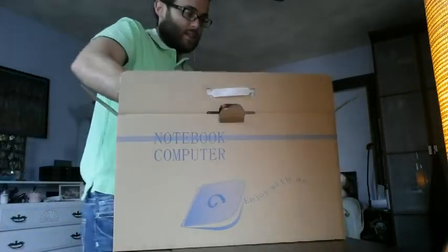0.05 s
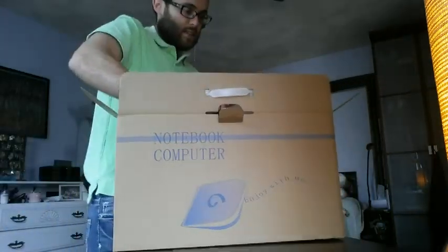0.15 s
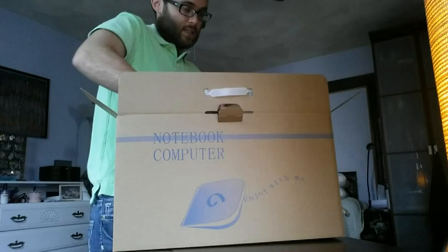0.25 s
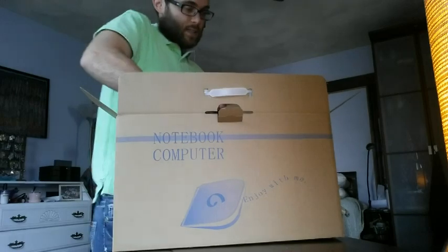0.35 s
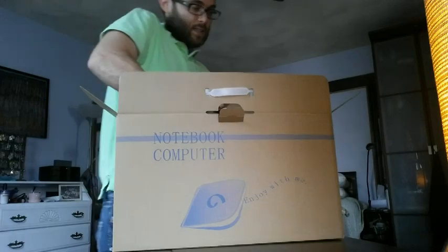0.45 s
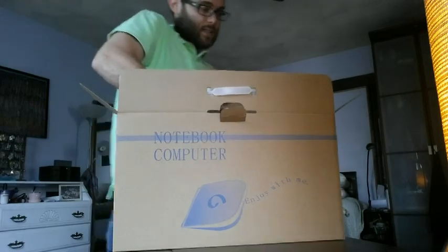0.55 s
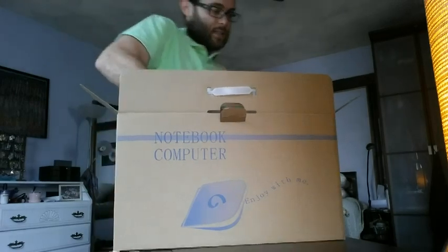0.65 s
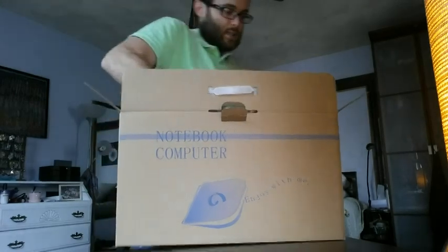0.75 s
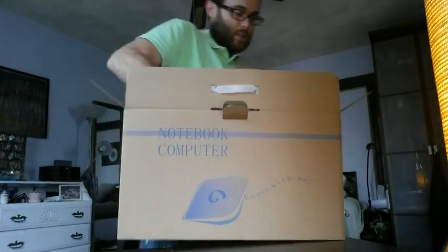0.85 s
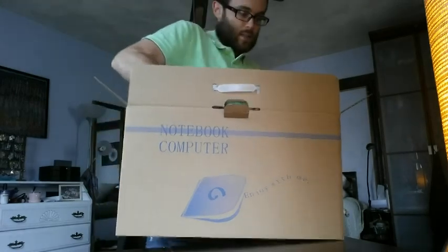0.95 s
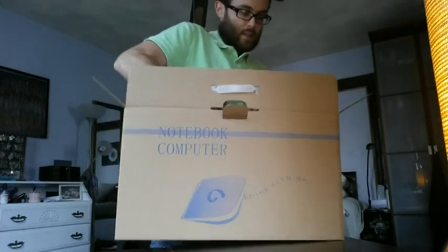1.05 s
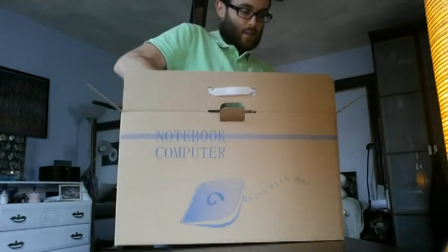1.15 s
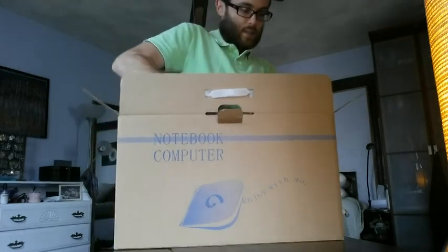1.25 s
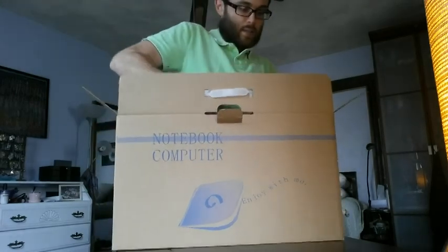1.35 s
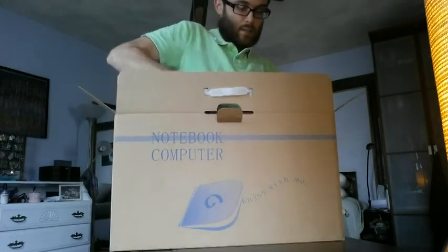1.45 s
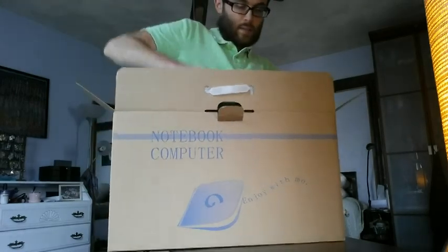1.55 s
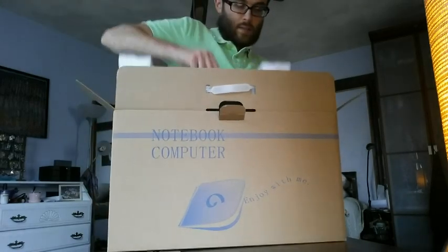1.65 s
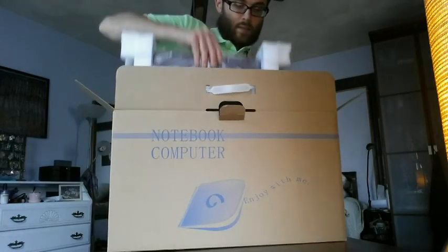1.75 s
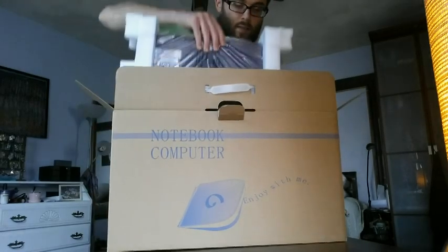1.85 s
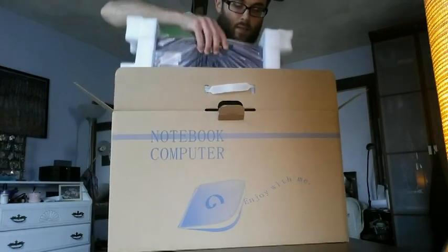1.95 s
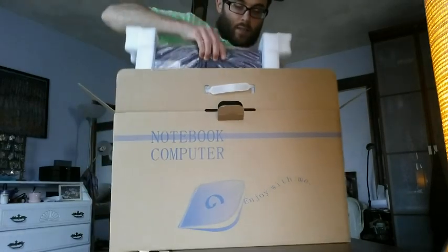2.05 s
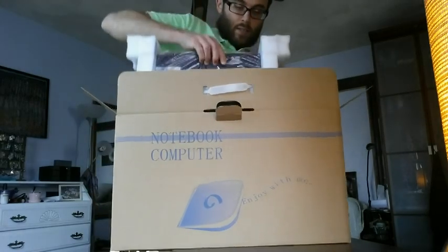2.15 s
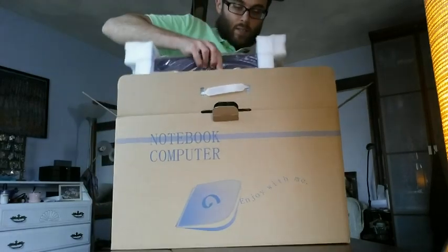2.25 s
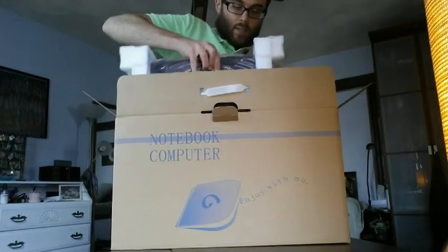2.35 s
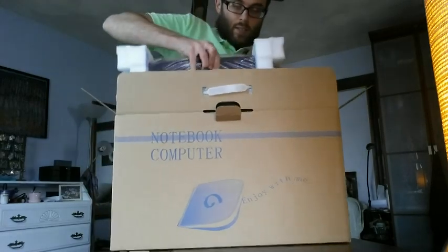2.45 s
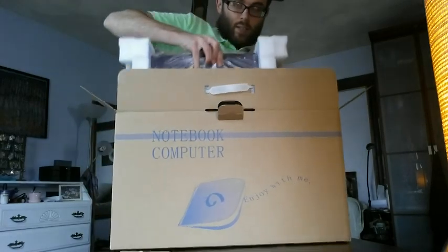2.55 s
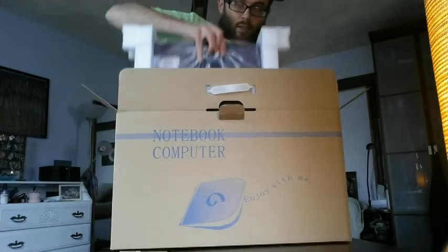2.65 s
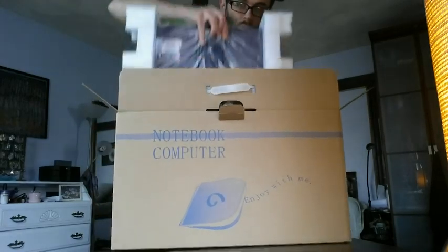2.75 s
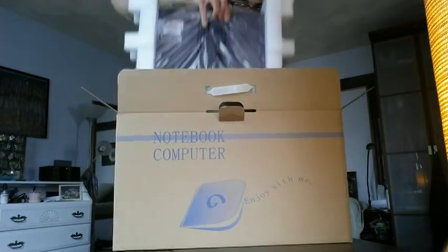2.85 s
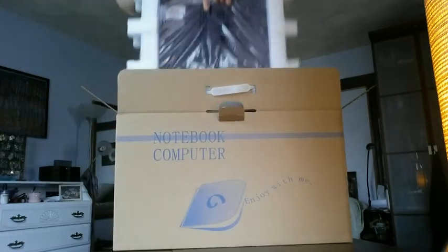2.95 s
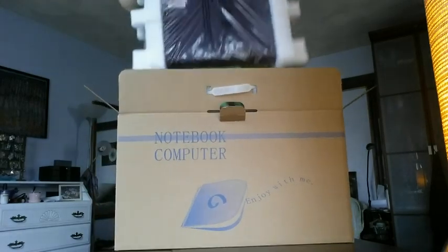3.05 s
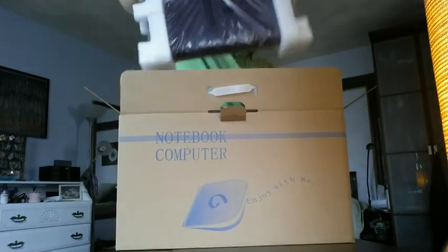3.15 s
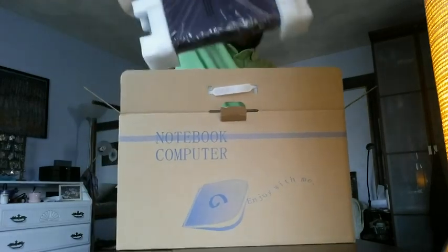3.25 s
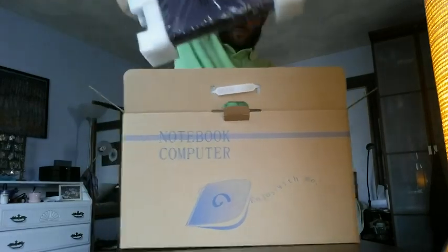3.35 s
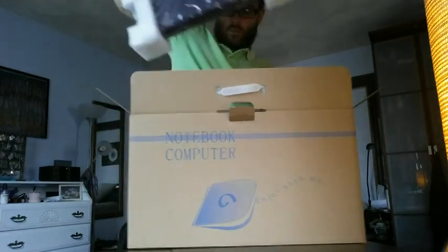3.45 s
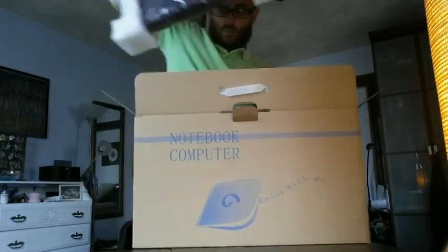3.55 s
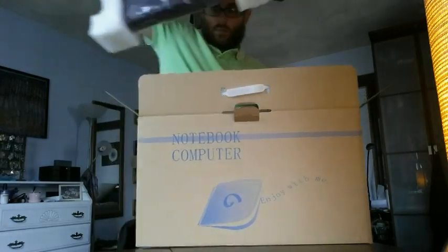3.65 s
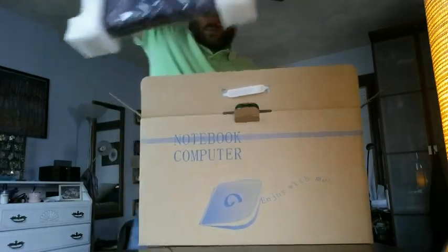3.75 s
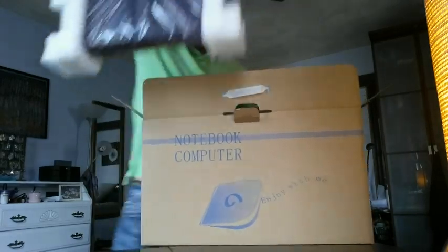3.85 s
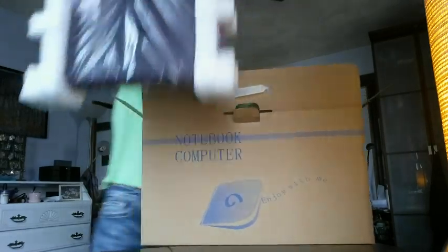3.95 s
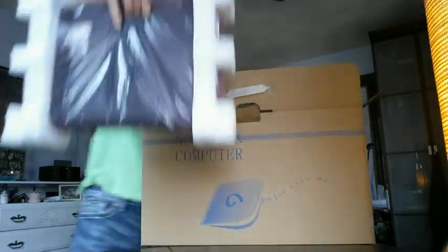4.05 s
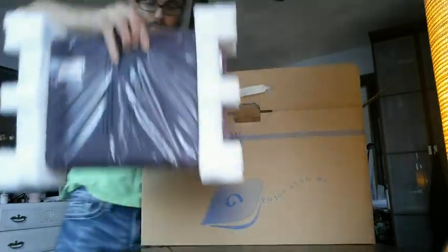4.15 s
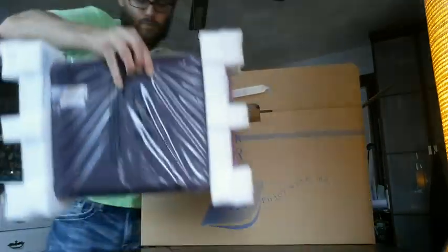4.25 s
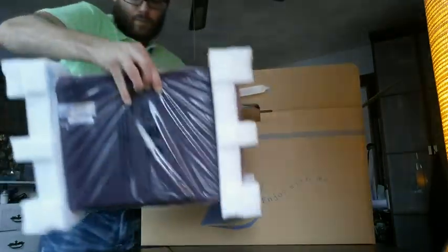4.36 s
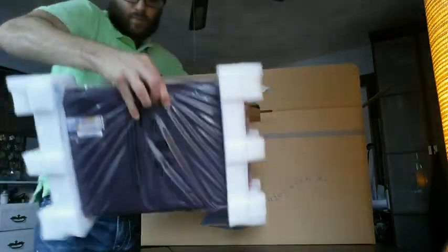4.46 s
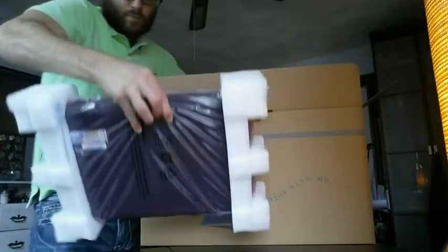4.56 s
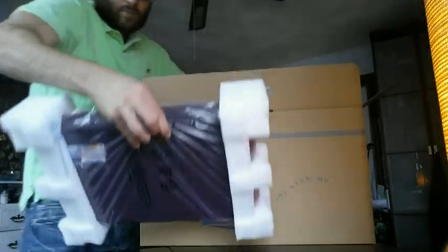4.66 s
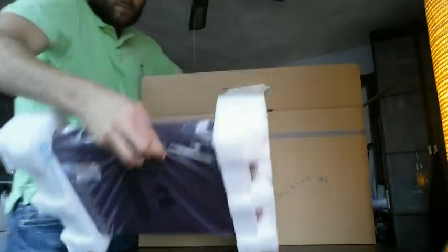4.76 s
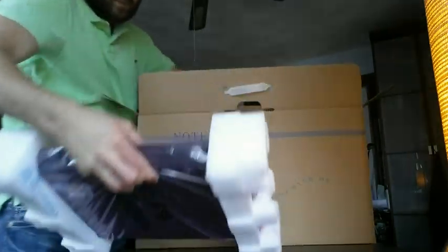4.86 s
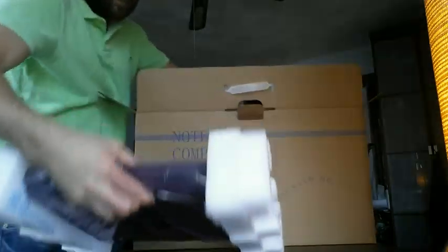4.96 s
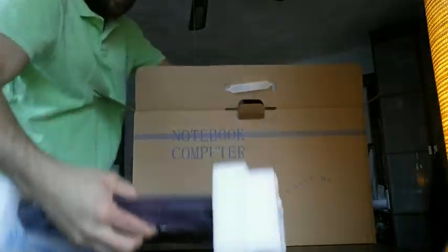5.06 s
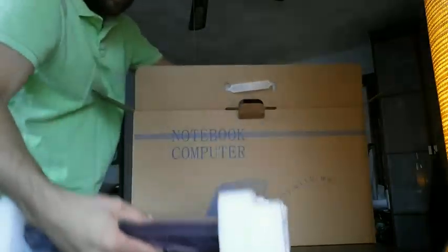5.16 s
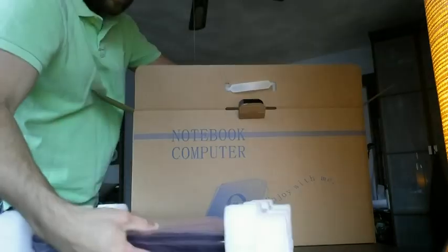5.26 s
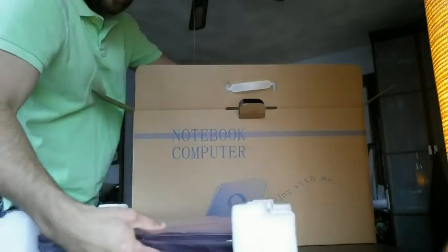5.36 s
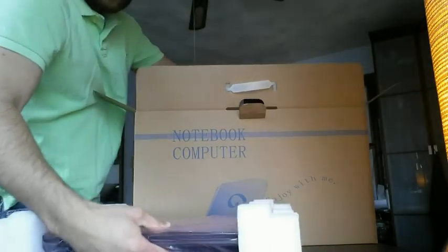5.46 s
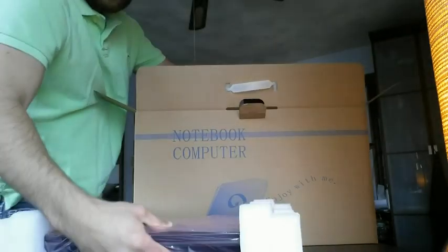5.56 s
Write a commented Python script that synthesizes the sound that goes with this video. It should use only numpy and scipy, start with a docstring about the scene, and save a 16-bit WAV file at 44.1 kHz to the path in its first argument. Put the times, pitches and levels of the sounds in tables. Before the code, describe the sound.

From the start, foam rubs against the inside of a cardboard box in short, scratchy strokes, with light bumps and small crackles from a plastic bag; a crisp scuff stands out at 0.8 seconds. At 1.5 seconds a sharp snap and a bump open a loud, hissing slide that lasts until about 2 seconds, ending in a dull thump. More rubbing and crinkling follow, then another strong slide around 2.8 seconds. Between 3.1 and 3.5 seconds the foam catches on the rim, giving a quick run of scuffs, snaps and hollow thumps, the heaviest at 3.3. It goes much quieter from 3.7 seconds, with only faint rustles as the laptop is carried. At 4.9 seconds the foam scuffs down on a table and slides with a hiss until about 5.6. The room is small, with slight echo and faint steady noise; the microphone adds a sharp, hissy edge.

```python
"""Unpacking a laptop

A laptop in a plastic bag and foam end caps is pulled from a cardboard box in a small room and laid on
the table. Stick-slip friction makes the foam hiss on the cardboard and scuff at the rim, the bag snaps
as its creases buckle, and the box thumps in the modes of its walls and air. The Helmholtz resonance of
a small microphone's port gives everything a sharp, hissy edge."""
import sys
import numpy as np
from scipy import signal
from scipy.fft import rfft, irfft
from scipy.io import wavfile

SR = 44100
rng = np.random.default_rng(int(sys.argv[2]) if len(sys.argv) > 2 else 0)


def log_audio(samples):
    """Write samples as a 16-bit WAV file to the path given in sys.argv[1]."""
    # one column per channel
    frames = np.atleast_2d(samples).T
    # limit to full scale, then quantise
    limited = np.clip(frames, -1, 1)
    pcm = np.round(limited * 32767).astype(np.int16)
    wavfile.write(sys.argv[1], SR, pcm)


N = 247709
TIME = np.arange(N) / SR
BIN_HZ = np.fft.rfftfreq(2 * N, 1 / SR)
PORT_HZ, PORT_Q = 6464, 9.35


def from_db(db):
    """Amplitude ratio for a level in decibels."""
    return 10 ** (np.asarray(db) / 20)


def unit_rms(x):
    """Normalisation to an rms of 1."""
    return x / np.sqrt(np.mean(x ** 2) + 1e-20)


def unit_energy(x):
    """Normalisation to a total energy of 1."""
    return x / np.sqrt(np.sum(x ** 2) + 1e-20)


def add(out, onset_s, sound):
    """Superposition: a sound joins the mix at its onset."""
    start = max(round(onset_s * SR), 0)
    out[start:start + len(sound)] += sound[:N - start]


def butterworth(x, hz, kind, order=2):
    """Maximally flat low-pass or high-pass filtering."""
    return signal.sosfilt(signal.butter(order, hz, kind, fs=SR, output="sos"), x)


def coloured(x, spectrum):
    """Spectral shaping by a curve of (f/Hz, level/dB) points; rms 1."""
    hz, db = np.transpose(spectrum)
    gain = from_db(np.interp(np.log(BIN_HZ + 1), np.log(hz), db))
    return unit_rms(irfft(rfft(x, 2 * N) * gain)[:N])


def drift(per_s, size=N):
    """Random modulation: linear interpolation between Gaussian values; rms 1."""
    values = rng.standard_normal(4096)
    return unit_rms(np.interp(TIME[:size] * per_s, np.arange(len(values)), values))


def radiate(x, crisp_db, dull_db, lowest_hz):
    """Light foam and film are poor bass radiators: a contact has just a crisp top and a dull body."""
    body = butterworth(butterworth(x, 2400, "low", order=3), lowest_hz, "high")
    return from_db(crisp_db) * butterworth(x, 4000, "high") + from_db(dull_db) * body


def slips(per_s, spread_db):
    """Stick-slip friction as a Poisson train of impulses of uneven size; rms 1."""
    sizes = from_db(spread_db * np.minimum(rng.exponential(1, N), 4)) * rng.choice([-1, 1], N)
    chance = np.clip(per_s / SR, 0, 1)
    return unit_rms(sizes * (rng.random(N) < chance) / np.sqrt(chance))


def ambient_noise(level_db=-55):
    """The noise floor is stationary Gaussian noise."""
    # background spectrum: (f/Hz, relative level/dB)
    spectrum = [(25, -14), (60, 12), (120, 12.5), (250, 15.5), (400, -12), (600, -49), (1200, -1),
                (3000, -30), (7000, -9), (14000, 1)]
    return from_db(level_db) * coloured(rng.standard_normal(N), spectrum)


def room(x, t60_s=0.48, treble_t60_s=0.24, tail_db=-13):
    """Reverberation: the direct sound plus a diffuse field that decays exponentially, treble first."""
    t = TIME[:SR]
    noise = rng.standard_normal(SR) * (1 - np.exp(-(t / 0.0051) ** 2))
    low = butterworth(noise, 2200, "low", order=1)
    tail = unit_energy(low * from_db(-60 * t / t60_s) + (noise - low) * from_db(-60 * t / treble_t60_s))
    return x + from_db(tail_db) * butterworth(signal.fftconvolve(x, tail)[:N], 64, "high")


def crinkles(hiss_db, per_s=8.7, spread_db=10.5):
    """Small snaps of the bag as a Poisson process, their level following the rubbing hiss."""
    draws = rng.random((200, 2))
    times = np.cumsum(-np.log(draws[:, 0])) / per_s
    crisp_db = np.interp(times, TIME, hiss_db) + 1.0 + spread_db * (2 * draws[:, 1] - 1)
    return [(onset, db, db - 17.5) for onset, db in zip(times, crisp_db) if onset < TIME[-SR // 20]]


def crumple(click=0, rise_s=0.0003, decay_s=0.0023):
    """A buckling transient: a click and a noise burst, as strong near PORT_HZ as a unit impulse."""
    t = TIME[:SR // 40]
    burst = unit_energy(rng.standard_normal(len(t)) * (1 - np.exp(-t / rise_s)) * np.exp(-t / decay_s))
    burst[0] += click
    treble = abs(np.fft.rfftfreq(len(t), 1 / SR) - PORT_HZ) < PORT_HZ / 5
    return burst / np.sqrt(np.mean(abs(rfft(burst)[treble]) ** 2))


def snaps(hiss_db, echo_db=-4.5):
    """Snap-through buckling: a crease flips, and a near surface scatters the sound back."""
    # loud snaps of bag and foam: (t/s, relative crisp level/dB, relative dull level/dB)
    loud_snaps = [(0.5437, -30, -58), (0.5742, -27.5, -47), (0.588, -27.5, -60), (0.6465, -28.5, -55),
                  (0.7163, -20, -45), (0.7883, -21.5, -36), (0.8933, -30, -60), (0.9913, -26, -40),
                  (1.16, -32, -57), (1.5033, -10.5, -27.5), (1.5119, -23, -28), (1.986, -20.5, -30.5),
                  (2.0046, -22.5, -45), (2.0327, -18, -32), (2.1785, -20.5, -32.5), (2.265, -31, -30.5),
                  (2.3032, -20.5, -55), (2.3483, -27, -48), (2.4508, -21.5, -53), (2.4625, -18.5, -32),
                  (2.5109, -20.5, -49), (3.1223, -12.5, -51), (3.132, -25, -20), (3.2162, -18.5, -40),
                  (3.3185, -17, -26), (3.424, -21.5, -33), (3.827, -28.5, -48.5), (4.1634, -33, -54),
                  (4.3982, -30.5, -32), (5.356, -23, -30)]
    out = np.zeros(N)
    for onset, crisp, dull in loud_snaps + crinkles(hiss_db):
        tone = dict(crisp_db=crisp + 13, dull_db=dull + 27.5, lowest_hz=1400)
        add(out, onset, radiate(crumple(click=0.82), **tone))
        delay_s = 0.0062 * rng.uniform(0.46, 1.3)
        add(out, onset + delay_s, from_db(echo_db) * radiate(crumple(), **tone))
    return butterworth(out, 13500, "low")


def scuffs():
    """Transient stick-slip: a cap catches on an edge and tears free in a dense run of slips."""
    # foam catching on cardboard: (t/s, relative crisp level/dB, relative dull level/dB, rise/s, decay/s)
    catches = [(0.775, -9, -28.5, 0.0098, 0.01), (1.504, -19.5, -34, 0.0016, 0.027),
               (3.122, -15.5, -32, 0.0036, 0.026), (3.214, -14.5, -30.5, 0.0045, 0.017),
               (3.319, -23, -39.5, 0.0044, 0.017), (3.4237, -29.5, -40.5, 0.0027, 0.022),
               (4.879, -29, -40, 0.0028, 0.013), (4.907, -20, -38, 0.0043, 0.0069)]
    out, t = np.zeros(N), TIME[:SR // 5]
    grains = butterworth(slips(per_s=6000, spread_db=2.5), 11500, "low", order=4)
    for onset, crisp, dull, rise_s, decay_s in catches:
        force = (1 - np.exp(-(t / rise_s) ** 2)) * np.exp(-t / decay_s)
        burst = grains[round(onset * SR):][:len(t)] * force
        add(out, onset, radiate(burst, crisp - 4.5, dull + 14.5, lowest_hz=840))
    return out


def mode(hz, t60_s, rise_s):
    """A damped oscillator swells while the contact lasts, then decays freely."""
    t = TIME[:SR]
    return np.sin(2 * np.pi * hz * t) * from_db(-60 * t / t60_s) * (1 - np.exp(-(t / rise_s) ** 2))


def air_coupling(wall_hz, air_hz, half_width_hz=15):
    """Resonance: an air mode responds most to a wall vibrating near its own frequency."""
    return 1 / np.hypot(1, (wall_hz - air_hz) / half_width_hz)


def box_bumps(wall_t60_s=0.082, push_s=0.0092, contact_s=0.0021):
    """Modal vibration: a struck wall booms, its upper modes knock and the coupled air hums on."""
    # impacts on the box: (t/s, relative boom level/dB, wall fundamental f/Hz, relative knock level/dB)
    impacts = [(0.219, -34, 115.6, -50.5), (0.478, -32, 95.4, -42), (0.586, -36, 134, -49),
               (1.031, -35.5, 109.6, -65), (1.506, -24, 116.6, -46), (2.012, -21, 114, -56),
               (2.313, -28.5, 121.6, -48.5), (2.785, -35.5, 120.7, -52), (3.124, -17.5, 103, -30),
               (3.212, -23.5, 115, -41), (3.254, -33, 134.6, -45), (3.311, -11.5, 122.4, -28.5),
               (3.419, -15.5, 130.5, -28.5), (3.486, -19.5, 129, -39.5), (4.433, -48, 131.5, -52.5)]
    # upper modes of a wall: (ratio to the fundamental, relative level/dB, T60/s)
    wall_modes = [(1.6, 6, 0.11), (2.1, -5.5, 0.27), (2.7, 5.5, 0.11), (3.5, 2.5, 0.064), (4.45, 1.5, 0.1),
                  (5.1, 2.5, 0.049), (6.8, -14.5, 0.12)]
    # bass modes of the air in box and room: (f/Hz, relative level/dB, T60/s)
    air_modes = [(100.6, -14, 0.33), (127.6, -9, 0.28)]
    out = np.zeros(N)
    for onset, boom_db, wall_hz, knock_db in impacts:
        air = sum(from_db(db) * air_coupling(wall_hz, hz) * mode(hz, t60, push_s)
                  for hz, db, t60 in air_modes)
        add(out, onset, from_db(boom_db + 3.5) * (mode(wall_hz, wall_t60_s, push_s) + air))
        for ratio, db, t60 in wall_modes:
            strength = from_db(knock_db + db + rng.normal(0, 3)) * rng.choice([-1, 1])
            add(out, onset, strength * mode(ratio * wall_hz, t60, contact_s))
    return out


def stroke_power(away, roundness):
    """Power envelope of a stroke: 10 dB down at one rise or fall time away from full force."""
    power, near = np.zeros(N), away < 6
    power[near] = from_db(-10 * away[near] ** roundness) ** 2
    return power


def friction_levels(break_edge_s=0.02):
    """Incoherent strokes add in power; gives the relative hiss, scrape and panel levels/dB over time."""
    # the load shifting in the hand throughout: (hiss, scrape, panel level/dB)
    held_db = (-62.5, -64, -65.5)
    # slides out of the box, then over the table:
    # (full force t/s, rise/s, hold/s, fall/s, hiss level/dB, scrape level/dB, panel level/dB)
    slides = [(1.317, 0.092, 0.15, 0.063, -35, -42, -44.5), (1.512, 0.084, .39, 0.059, -25, -38, -41),
              (2.778, 0.14, 0.06, .11, -25.5, -40.5, -45.5), (5.157, 0.11, .17, 0.067, -30, -41, -52.5),
              (5.47, 0.093, 0.052, 0.15, -32.5, -42, -51)]
    # the grip shifts or a cap brushes a wall: (peak t/s, duration/s, hiss level/dB, panel level/dB)
    rubs = [(0.01, 0.21, -37.5, -49.5), (0.189, 0.1, -33, -46), (0.261, 0.084, -39, -51.5),
            (0.386, .14, -30, -34), (0.513, 0.12, -36.5, -46.5), (0.651, 0.15, -41.5, -47),
            (0.727, .07, -33, -43.5), (0.799, 0.15, -33, -40), (0.991, 0.21, -38, -42.5),
            (1.137, 0.34, -39.5, -47), (2.039, 0.19, -31, -41.5), (2.188, 0.44, -36, -49),
            (2.419, 0.29, -33.5, -44.5), (2.616, 0.23, -41.5, -46.5), (3.008, 0.1, -39.5, -50.5),
            (3.177, 0.21, -35.5, -47.5), (3.369, 0.14, -36, -48), (3.507, 0.18, -37.5, -46.5),
            (3.818, .08, -50.5, -52.5), (3.898, 0.035, -56, -54), (4.207, 0.18, -56.5, -62.5),
            (4.312, 0.063, -57, -56), (4.412, 0.15, -50, -63), (4.869, 0.3, -48.5, -53),
            (4.969, 0.082, -39, -55)]
    # the foam loses touch with the cardboard: (centre t/s, duration/s, attenuation/dB)
    breaks = [(0.125, 0.029, 4), (1.182, 0.048, 9.5), (3.066, 0.073, 13)]
    power = np.outer(from_db(held_db) ** 2, np.ones(N))
    for start, rise_s, hold_s, fall_s, *levels in slides:
        away = np.maximum((start - TIME) / rise_s, 0) + np.maximum((TIME - start - hold_s) / fall_s, 0)
        power += np.outer(from_db(levels) ** 2, stroke_power(away, roundness=1.44))
    for peak, length_s, hiss, panel in rubs:
        scrape = 0.82 * hiss - 17
        away = 2 * abs(TIME - peak) / length_s
        power += np.outer(from_db([hiss, scrape, panel]) ** 2, stroke_power(away, roundness=1.41))
    hush_db = sum(db * np.clip(0.5 + (length_s / 2 - abs(TIME - centre)) / break_edge_s, 0, 1)
                  for centre, length_s, db in breaks)
    return 10 * np.log10(power) - hush_db


def rubbing(hiss_db, scrape_db, panel_db, peak_slips_per_s=16000):
    """Sliding friction: harder rubbing slips more often, the grip judders, the walls answer unevenly."""
    # bright rubbing hiss, with its top cut off above 11.5 kHz: (f/Hz, relative level/dB)
    hiss_spectrum = [(1200, -14), (2800, 0.5), (4200, -1), (6500, 1), (9000, 2.5), (11500, 4), (14000, -20)]
    # coarse scrape and cardboard panel: (f/Hz, relative level/dB)
    scrape_spectrum = [(400, -14.5), (900, 1), (1120, 0.5), (1390, 3.5), (1680, -1), (2100, 1.5),
                       (2600, -3), (3000, -4), (3500, -2.5), (4800, -6), (10000, -42)]
    panel_spectrum = [(30, -1), (65, -4.5), (100, 2), (130, 0), (185, -10), (340, 1.5), (440, -3),
                      (540, 4.5), (640, 0.5), (730, -3), (860, -4), (1050, -18.5), (2000, -19), (8000, -45)]
    slip_rate = peak_slips_per_s * from_db(0.45 * (hiss_db - hiss_db.max()))
    judder = unit_rms(from_db(0.96 * drift(per_s=110)))
    flutter = unit_rms(from_db(2.0 * drift(per_s=45)))
    hiss = from_db(hiss_db - 8.5) * coloured(slips(slip_rate, spread_db=1.8), hiss_spectrum)
    scrape = from_db(scrape_db - 2.0) * coloured(slips(slip_rate, spread_db=0.5), scrape_spectrum)
    walls = from_db(panel_db + 0.9) * coloured(slips(slip_rate, spread_db=3.5), panel_spectrum)
    return judder * (hiss + scrape + flutter * walls)


def scene():
    """Superposition of the handling sounds in the room and its noise floor, alike in both channels."""
    floor = ambient_noise()
    hiss_db, scrape_db, panel_db = friction_levels()
    handling = rubbing(hiss_db, scrape_db, panel_db) + scuffs() + box_bumps() + snaps(hiss_db)
    mono = room(handling) + floor
    return np.array([mono, mono])


def record(dry, bass_cut_hz=62, stopband_hz=15600):
    """The microphone port is a Helmholtz resonator; deep bass is weak and the top is cut steeply."""
    port = 1 / (1 - (BIN_HZ / PORT_HZ) ** 2 + 1j * BIN_HZ / (PORT_HZ * PORT_Q))
    resonant = irfft(rfft(dry, 2 * N) * port)[:, :N]
    heard = butterworth(resonant, bass_cut_hz, "high")
    return signal.sosfilt(signal.cheby2(14, 70, stopband_hz, fs=SR, output="sos"), heard)


dry = scene()
out = record(dry)
log_audio(out)
```